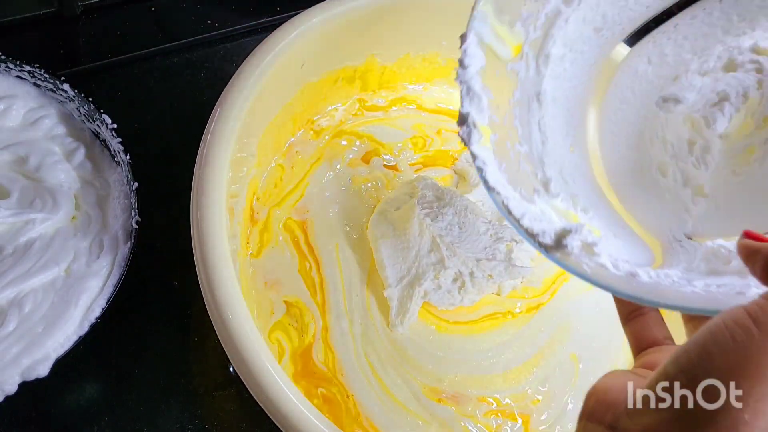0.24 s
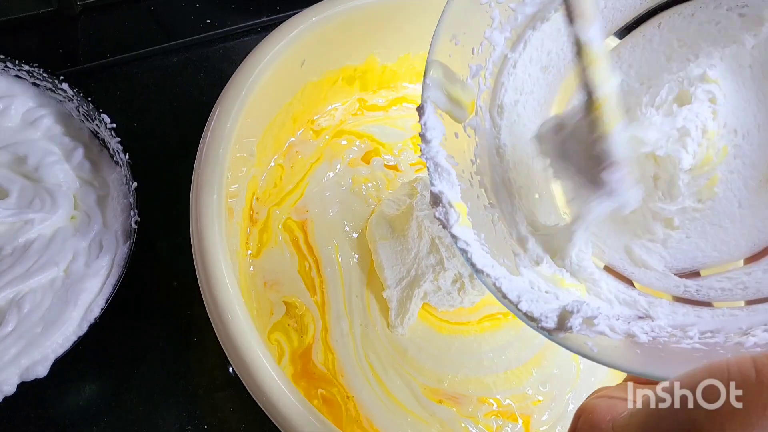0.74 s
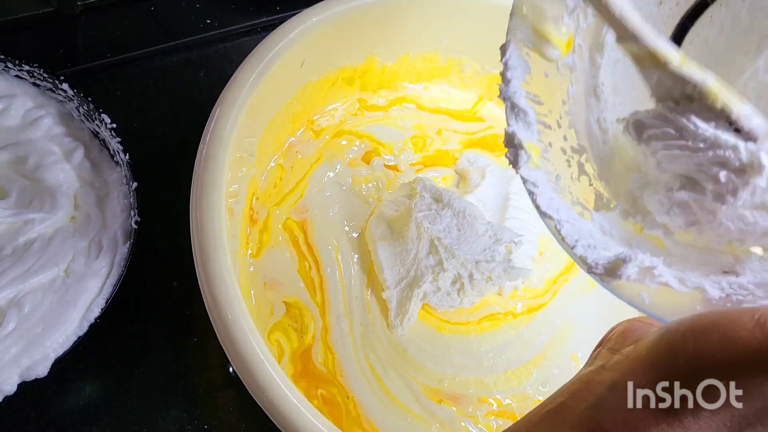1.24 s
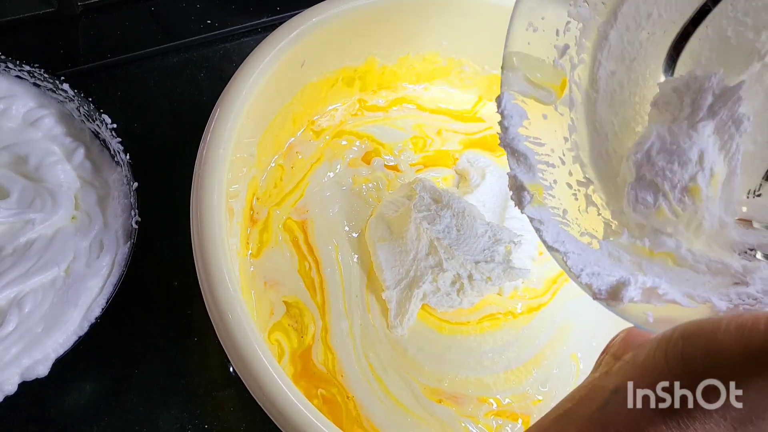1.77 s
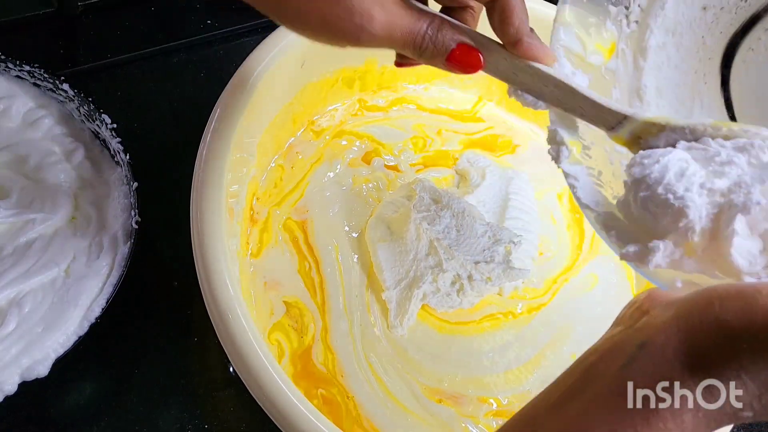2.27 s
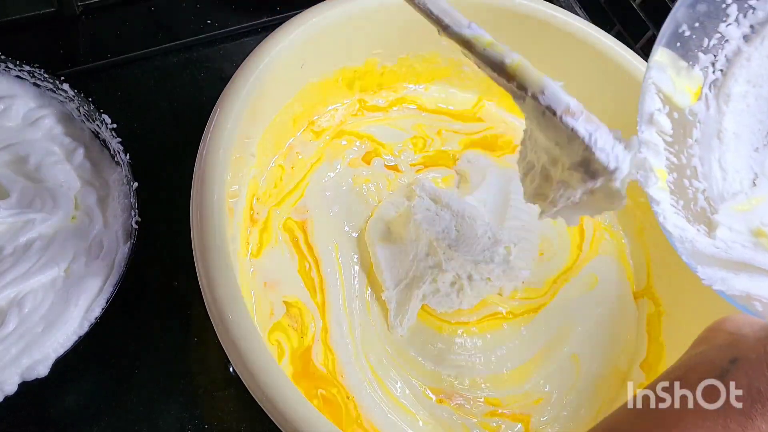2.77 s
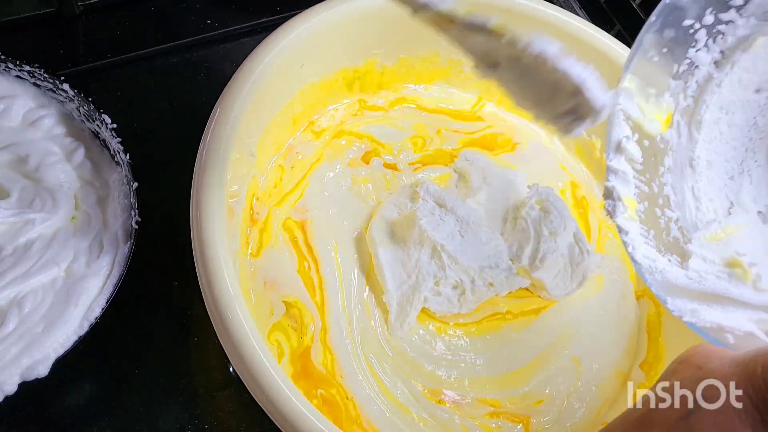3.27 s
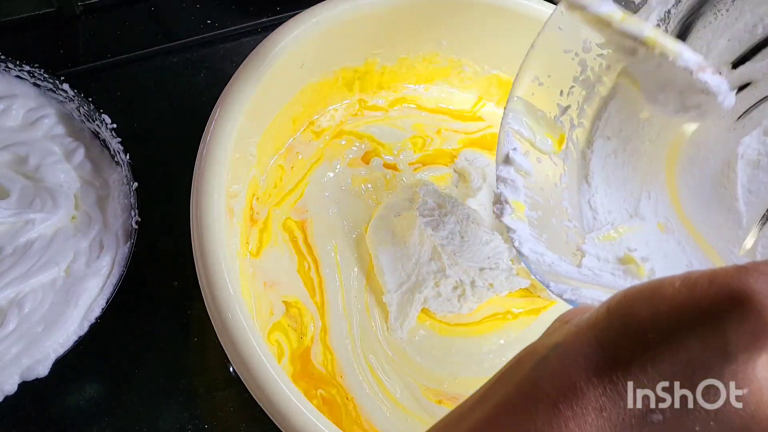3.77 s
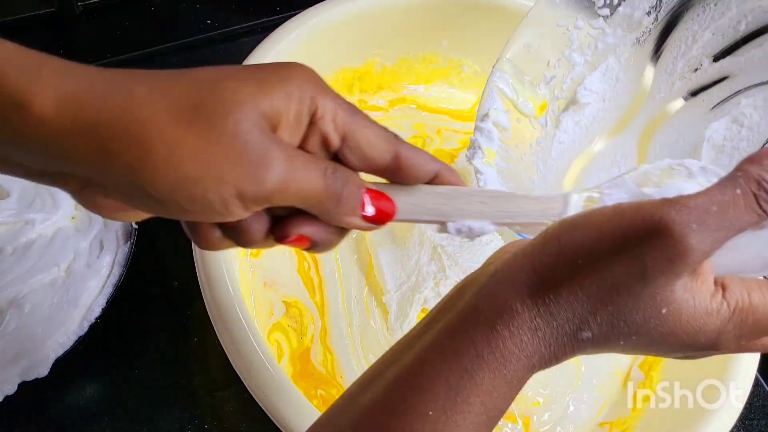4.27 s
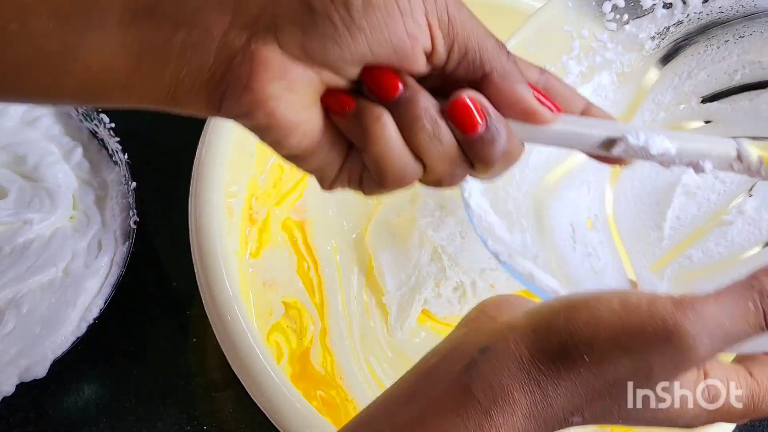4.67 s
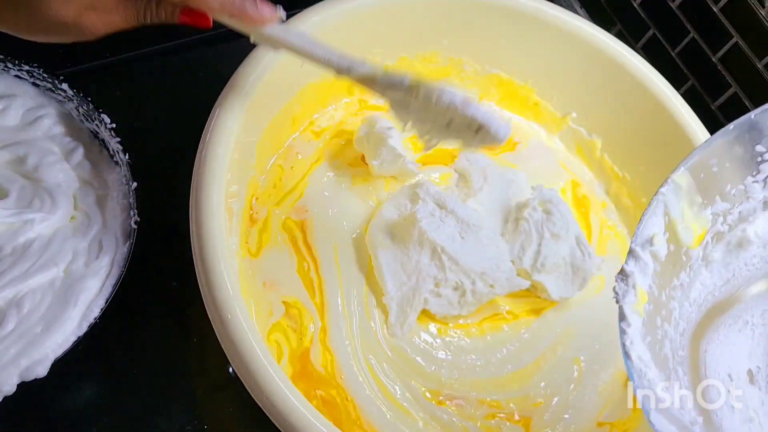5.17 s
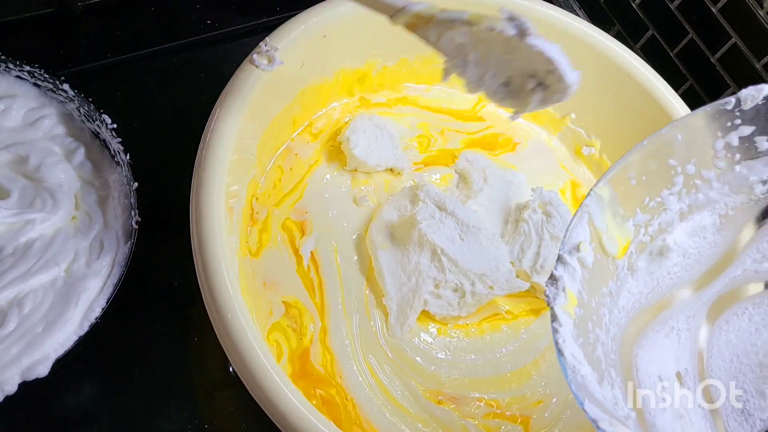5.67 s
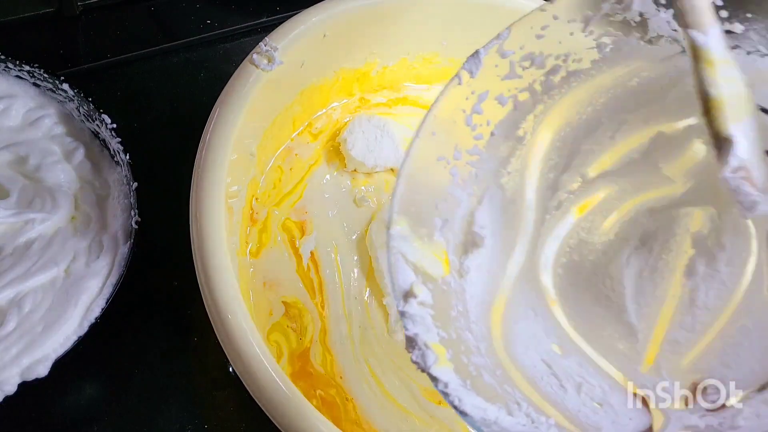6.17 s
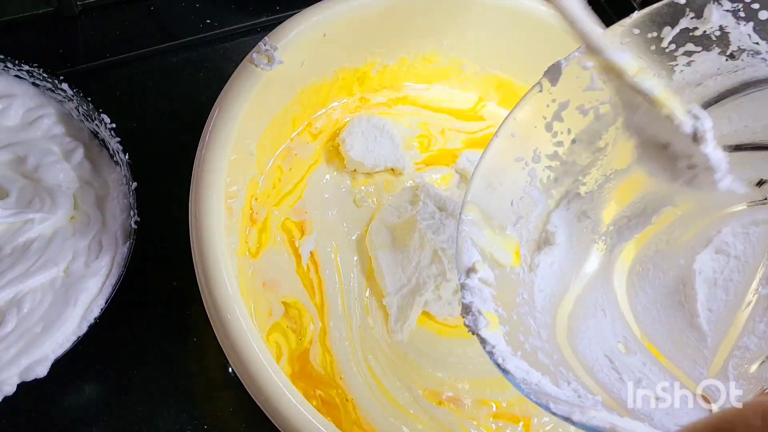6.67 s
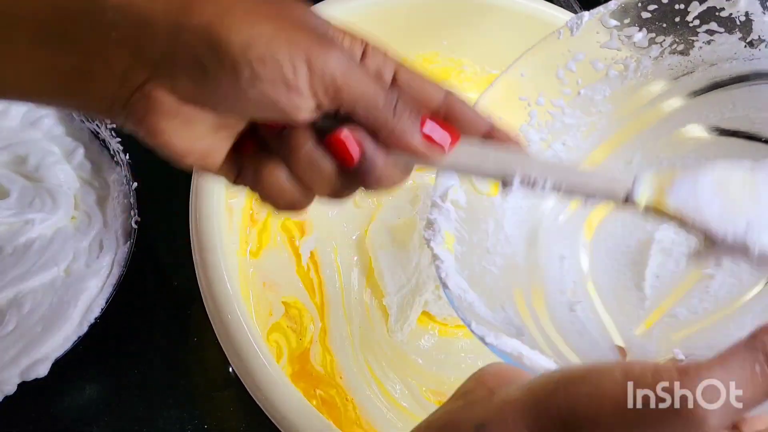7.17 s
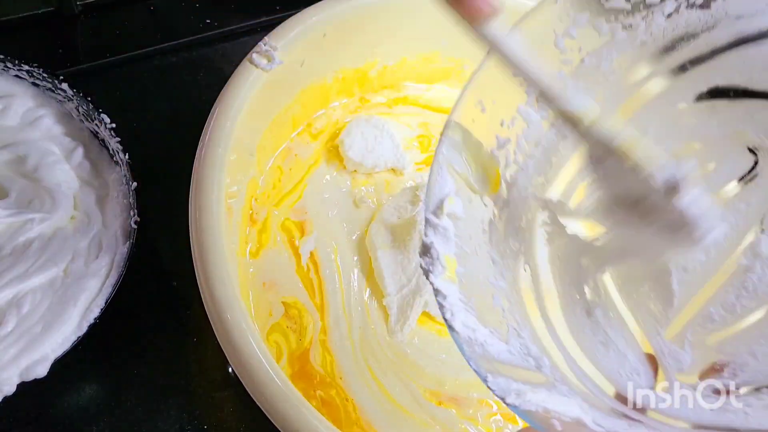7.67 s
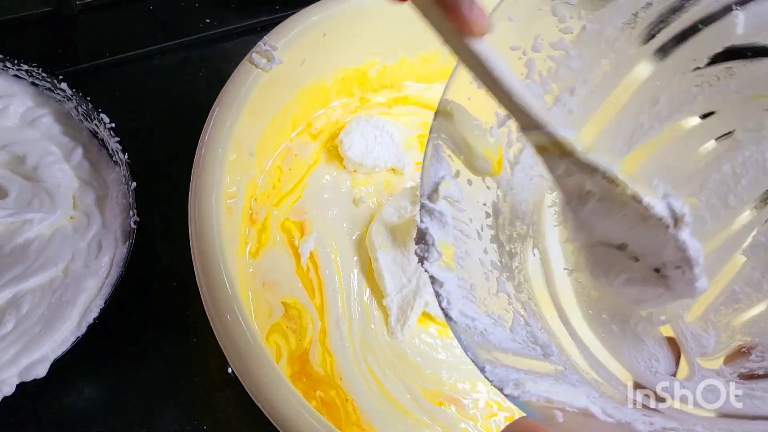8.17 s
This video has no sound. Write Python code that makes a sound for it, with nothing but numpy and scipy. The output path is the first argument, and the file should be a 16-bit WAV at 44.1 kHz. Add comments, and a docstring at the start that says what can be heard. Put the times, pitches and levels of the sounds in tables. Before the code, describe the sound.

Whipped cream crackles faintly as a wooden spoon scoops it from glass with dull knocks, then raps twice on a rattling plastic mixing bowl.

```python
"""Spooning whipped cream

A kitchen, a stereo pair close to the bowls, an appliance humming behind. A wooden spoon scoops whipped
cream from a hand-held glass bowl: the foam fizzes and pops, the wood rubs the glass and knocks on it
through a cushion of cream. Rapped twice on its rim, a plastic mixing bowl rattles on the counter."""
import sys
import numpy as np
from scipy import signal
from scipy.fft import rfft, irfft
from scipy.io import wavfile

SR = 44100
rng = np.random.default_rng(int(sys.argv[2]) if len(sys.argv) > 2 else 0)


def generate_wav(signal):
    """Clip the signal to [-1, 1] and save it as 16-bit WAV at the path in sys.argv[1]."""
    frames = np.transpose(np.atleast_2d(signal))
    scaled = np.clip(frames, -1, 1) * 32767
    pcm = np.round(scaled).astype(np.int16)
    wavfile.write(sys.argv[1], SR, pcm)


N = 372108
TIME = np.arange(N) / SR

# diffuse sound across the two microphones: f/Hz, coherence
COHERENCE = [(60, 0.32), (150, 0.62), (380, 0.78), (950, -0.25), (2400, -0.063), (5000, 0), (16000, 0)]
# still air of the kitchen: f/Hz, relative level/dB
ROOM_TONE = [(15, -21.5), (25, -2), (108, -8), (175, -8), (242, -21.5), (344, -13.5), (384, -21.5),
             (677, -25.5), (988, -32.5), (1520, -38.5), (3250, -47), (3720, -45.5), (5140, -44),
             (10700, -37), (12200, -48.5), (16000, -55)]
# appliance motor and mains: f/Hz, rms level/dB, waver/dB
HUM = [(38.5, -72.5, 3.5), (50, -60, 2), (100.3, -59.5, 0.4), (152.7, -65.5, -0.5)]
# appliance casing and fan: f/Hz, width/Hz, rms level/dB
WHIRR = [(95, 17, -64), (354, 56, -75.5), (631.8, 17, -78.5), (1540, 78, -88), (3620, 300, -88)]
# early reflections against the direct sound: f/Hz, level/dB
EARLY_SPECTRUM = [(80, -18), (350, -11), (700, -6), (1500, -3.5), (4000, -1), (14000, -4.5)]
# reverberation against the direct sound: f/Hz, level/dB
TAIL_SPECTRUM = [(80, -3.5), (250, -14), (600, -15), (1500, -9), (4000, -7), (14000, -9.5)]
# reverberation time: f/Hz, t60/s
TAIL_T60 = [(100, .45), (300, .4), (1000, .44), (3000, .47), (6000, .43), (14000, .33)]

# air pockets in the cream: t/s, level/dB, low cut/Hz, left over right/dB
POPS = [(0.1092, -34.5, 1500, 11), (.8807, -25, 1210, -4.5), (1.0084, -24, 3520, -3),
        (2.0037, -23, 1500, -4), (5.195, -21.5, 500, 1), (6.0873, -28, 700, 17), (6.594, -17.5, 9100, -13),
        (7.426, -32, 5140, 18), (7.9287, -17, 900, -1)]
# spoon strokes: t of fastest moment/s, swell/s, fade/s, fizz/dB, rub/dB, drag/dB
STROKES = [(.13, .03, 0.2, -70, -73.5, -61), (.62, 0.48, 0.17, -66.5, -76, -66),
           (1.11, 0.2, 0.27, -70.5, -73, -63), (1.5, 0.11, 0.24, -66, -64, -60.5),
           (1.862, 0.012, 0.03, -56, -82, -81), (2.02, 0.11, 0.16, -64, -70.5, -58.5),
           (2.5, 0.16, 0.075, -68.5, -71.5, -58.5), (2.66, 0.019, 0.063, -78, -66.5, -65),
           (2.93, 0.019, 0.049, -81.5, -60, -53.5), (3.7, 0.15, 0.35, -60.5, -69.5, -64.5),
           (4.2, 0.27, 0.26, -77.5, -61.5, -60.5), (4.66, 0.066, .09, -67, -73.5, -72),
           (5.15, 0.032, 0.055, -65.5, -75.5, -70), (5.21, 0.02, 0.041, -80, -64.5, -60),
           (6.1, .04, 0.12, -77, -66.5, -67), (6.28, 0.12, 0.07, -60.5, -72, -79.5),
           (6.8, 0.092, 0.26, -64.5, -72, -72.5), (7.55, 0.04, 0.071, -65, -65.5, -52.5),
           (7.88, .1, .12, -68, -65.5, -71), (8.14, 0.13, 0.15, -69, -71, -70)]
# noise colours: f/Hz, relative level/dB
POP_SPECTRUM = [(500, -3.5), (1500, -1), (2600, -8), (4000, -5.5), (8000, -3.5), (16000, -2)]   # an air pocket snapping
FIZZ_SPECTRUM = [(1500, -23.5), (3000, -15.5), (4000, -8), (6000, -4), (9000, 0.5), (12000, 2.5),
                 (16000, -3)]   # foam cells bursting
RUB_SPECTRUM = [(900, -2), (1400, 2), (1850, -4.5), (2400, -0.5), (3000, -5), (3900, 3), (5200, -1),
                (7000, -3.5), (12000, -10.5)]   # wood rubbing glass
DRAG_SPECTRUM = [(120, -7.5), (200, 4.5), (260, -0.5), (350, 2.5), (480, 1), (670, -0.5), (900, -13),
                 (1500, -26.5), (3000, -34)]   # the spoon dragging on the wall
TICK_SPECTRUM = [(700, -5), (1500, -6), (2600, -5), (4000, -3.5), (6500, -5.5), (10000, -1.5),
                 (16000, -5.5)]   # wet foam under a knock
BUZZ_SPECTRUM = [(500, -4), (1200, 14.5), (2000, 4.5), (2900, -6), (3900, -3), (5200, -7), (8000, -12.5),
                 (12000, -15), (16000, -19.5)]   # plastic buzzing
# borders between the size classes of foam cells: f/Hz
FOAM_EDGES = [3000, 5000, 7500, 10500]

# raps on the mixing bowl: t/s, crack/dB, landing/dB, bass tilt/(dB per octave), first bounce/dB,
# dulling/(octaves per bounce)
RAPS = [(5.2778, 34, 28.5, 1, 27, 0.1), (5.4805, 33, 27, 3, 19.5, .22)]
# plastic rim and spoon handle: f/Hz, width/Hz, level/dB
PLASTIC_RIM_MODES = [(590, 22, -6), (865, 61, -2), (1032.1, 94, -4), (1420, 150, -14), (1706, 570, -24),
                     (2260, 200, -29), (4070, 490, -31.5)]
# mixing bowl full of batter, standing on the counter: f/Hz, width/Hz, level/dB
MIXING_BOWL_MODES = [(50, 24, -10.5), (89.3, 14, 4), (114.3, 7.3, 9), (144, 39.8, 1), (202.9, 12, 12),
                     (242, 23, 1), (303.4, 14, 3.5), (409.6, 15, -2), (450, 12, 4.5), (505, 15, 9),
                     (590, 12, 4), (690, 10, 2.5), (805, 14, -6), (819.4, 120, 2.5), (1005, 46, -2.5),
                     (1140, 30, 2.5), (1630, 70, -0.5)]

# touches on the bare glass rim: t/s, level/dB
CLINKS = [(1.9976, -4), (2.1945, -9.5), (7.5396, -2)]
# bare glass rim: f/Hz, width/Hz, level/dB
GLASS_RIM_MODES = [(1940, 14, -4), (2582, 14, -0.5), (3680, 32, 2.5), (4830, 70, -11), (4950, 60, -5.5),
                   (7500, 40, -7)]
# spoon on the glass: t/s, force/dB, contact cut-off/Hz, wood resonance/Hz, wood/dB, wall ring/dB,
# wet tick/dB, left over right/dB
KNOCKS = [(.567, -20, 884, 600, -15, -12, -57, -1), (1.11, -18, 1090, 600, -11, 0, -33, 0),
          (1.1281, -7.5, 750, 226, 17, 3.5, -15.5, -3.5), (1.1383, -16, 496, 199, 12, 5, -39, -3),
          (1.158, -23, 900, 168, -3, -19, -36, 3), (1.5852, 13, 1040, 728, 19, 21, -14, -0.5),
          (1.823, -9.5, 600, 308, -3, -24, -25, 2.5), (1.997, -2, 1670, 600, -11, 4.5, -31, -6.5),
          (2.067, -19.5, 3030, 685, -18, -22, -46, -3), (2.1934, 9.5, 1100, 1090, 6, 6.5, -27.5, -1),
          (2.9355, -10.5, 1270, 360, -28, -34, -55, -2.5), (3.525, 2, 1274, 725, 0.5, 20, -23.5, -5),
          (6.02, 1.5, 1114, 783, -12, 23, -22.5, -1), (6.5117, 15, 5260, 1200, 20, 19, -3.5, -3.5),
          (7.333, -11, 570, 334, 5, -10, -34, 1), (7.5387, 7, 1910, 585, 6, 4, -32.5, -6),
          (7.557, 7, 856, 590, 2, 20.5, -23, -3), (7.7657, 11, 634, 510, 12, 20.5, -18, 1),
          (7.8744, 4, 600, 450, 4.5, 16.5, -21.5, 0), (8.0482, -7, 524, 326, 6.5, -14, -21, 1.5),
          (8.17, -12.5, 860, 770, -10.5, -25, -34.5, -6)]
# glass bowl, damped by hand and cream: f/Hz, width/Hz, level/dB
GLASS_MODES = [(516, 120, -1.5), (600, 270, 3), (727, 100, 4.5), (946, 50, -3), (1182, 440, -3),
               (1320, 400, -3), (1576, 140, -16.5), (1940, 130, -5), (2170, 220, -5), (2470, 580, -6),
               (2900, 210, -6.5), (3570, 270, -6), (4080, 1300, -14.5), (4950, 710, -12), (6270, 500, -7.5),
               (7950, 450, 2)]
# the bowl's give in the hand: f/Hz, width/Hz, level/dB
HAND_MODES = [(127, 31, -1), (243, 130, 3)]


def from_db(db):
    return 10 ** (np.asarray(db) / 20)


def unit_rms(x):
    return x / np.sqrt(np.mean(x ** 2) + 1e-20)


def unit_energy(x):
    return x / np.sqrt(np.sum(x ** 2))


def at_hz(points, hz):
    """Read a table on a log-frequency axis."""
    knots_hz, values = np.array(points).T
    return np.interp(np.log(hz + 1e-9), np.log(knots_hz), values)


def pan(db):
    """Microphone gains, the left louder than the right by db."""
    return from_db(np.array([[db], [-db]]) / 2)


def add(out, s, sound):
    """Mix a short sound in at s seconds."""
    i = int(s * SR)
    out[..., i:i + sound.shape[-1]] += sound[..., :out.shape[-1] - i]


def butter(x, order, hz, kind="low"):
    return signal.sosfilt(signal.butter(order, hz, kind, fs=SR, output="sos"), x)


def drift(per_s):
    """A smooth wander through per_s random values a second."""
    knots = rng.standard_normal(N // 20)
    return np.interp(TIME * per_s, np.arange(len(knots)), knots)


def noise(spectrum, size=N):
    """Coloured stereo noise, alike at both microphones in the bass; 0 dB is white noise of rms 1."""
    hz = np.arange(size // 2 + 1) * SR / size
    mid, side = rfft(rng.standard_normal((2, size)))
    alike = at_hz(COHERENCE, hz)
    both = np.sqrt((1 + alike) / 2) * mid + np.sqrt((1 - alike) / 2) * side * [[1], [-1]]
    return irfft(both * from_db(at_hz(spectrum, hz)), size)


def burst(spectrum, t60, size=8192):
    """A dying puff of noise; a 0 dB spectrum gives the energy of a unit click."""
    return noise(spectrum, size) * unit_energy(from_db(-60 * TIME[:size] / t60))


def contact(cut_hz, order=4, size=8192):
    """The force pulse of one touch: the softer the touch, the longer and duller."""
    return butter(signal.unit_impulse(size) + 1e-18, order, cut_hz)


def resonate(x, hz, width_hz):
    """One resonance with gain 1 at its peak."""
    r = np.exp(-np.pi * width_hz / SR)
    feedback = [1, -2 * r * np.cos(2 * np.pi * hz / SR), r * r]
    return signal.lfilter(np.array([1, 0, -1]) * (1 - r * r) / 2, feedback, x + 1e-18)


def body(x, modes, spread_db, lag_s):
    """Neighbouring modes swing opposite ways; each meets each microphone at its own level and delay."""
    out = np.zeros((2, len(x)))
    for k, (hz, width, db) in enumerate(modes):
        ring = (-1) ** k * resonate(x, hz, width)
        for mic in out:
            add(mic, lag_s * rng.random(), ring * from_db(db + spread_db * rng.standard_normal()))
    return out


def background(room_tone_db=-60):
    """An appliance's motor hums and its fan and casing whirr over the room tone."""
    hum = 0
    for hz, db, waver_db in HUM:
        peak = np.sqrt(2) * from_db(db + waver_db * drift(3.4))
        hum += peak * np.sin(2 * np.pi * (hz * TIME + rng.random()))
    air, whirr = noise(ROOM_TONE), 0
    for hz, width, db in WHIRR:
        band = resonate(resonate(air, hz, width), hz, width)
        whirr += from_db(db) * unit_rms(band)
    return hum * pan(.8) + whirr + from_db(room_tone_db) * unit_rms(noise(ROOM_TONE))


def kitchen_reverb(x, early_t60=.13, size=32768):
    """Near reflections from counter and tiles, then a diffuse tail that dies band by band."""
    t, hz = TIME[:size], np.arange(size // 2 + 1) * SR / size
    diffuse, tail = rfft(noise(TAIL_SPECTRUM, size)), 0
    for centre, t60 in TAIL_T60:
        band = at_hz([(f, f == centre) for f, _ in TAIL_T60], hz)
        fade = from_db(-60 * t / t60) * (1 - np.exp(-t / .005))
        tail += irfft(diffuse * band) * unit_energy(fade)
    early_fade = from_db(-60 * t / early_t60) * (1 - np.exp(-t / .001))
    early = noise(EARLY_SPECTRUM, size) * unit_energy(early_fade)
    return signal.fftconvolve(x.mean(axis=0)[None], early + tail, axes=1)[:, :N]


def air_pops():
    """Single pockets of air snap open in the cream; small ones have no lows."""
    out = np.zeros((2, N))
    for s, db, low_hz, side_db in POPS:
        snap = butter(burst(POP_SPECTRUM, t60=.018), 2, low_hz, "high")
        add(out, s, from_db(db) * snap * pan(side_db))
    return out


def stroke_gains(range_db=12):
    """Fizz, rub and drag gain range_db over a swell as the spoon speeds up, and lose it over a fade."""
    power = np.zeros((3, N))
    for s, swell_s, fade_s, *levels_db in STROKES:
        from_peak = np.maximum((s - TIME) / swell_s, (TIME - s) / fade_s)
        moving = from_peak < 5
        power[:, moving] += np.outer(from_db(levels_db), from_db(-range_db * from_peak[moving])) ** 2
    return np.sqrt(power)


def random_clicks(per_s, step_db, max_steps):
    """Impulses at random times, most weak and a few strong."""
    fires = rng.random(N) < per_s / SR
    return fires * from_db(step_db * np.minimum(rng.exponential(1, N), max_steps))


def foam_crackle(level_db=-3.5):
    """Sticky foam tears in tiny separate snaps."""
    snaps = random_clicks(per_s=140, step_db=4, max_steps=3.5)
    crackle = signal.fftconvolve(snaps[None], burst(FIZZ_SPECTRUM, t60=.0091), axes=1)[:, :N]
    return from_db(level_db) * unit_rms(crackle)


def foam_fizz(cell_decay_s=.0005, patch_db=3.5, patches_per_s=11):
    """Bursting cells make a grainy hiss whose colour shifts with coarser and finer foam."""
    cells = random_clicks(per_s=2500, step_db=3.5, max_steps=5)
    cell_power = signal.lfilter([1], [1, -np.exp(-1 / (SR * cell_decay_s))], cells)
    spectrum, hiss = rfft(noise(FIZZ_SPECTRUM)), 0
    size_class = np.searchsorted(FOAM_EDGES, np.arange(N // 2 + 1) * SR / N)
    for k in range(len(FOAM_EDGES) + 1):   # each class comes and goes on its own
        band = irfft(spectrum * (size_class == k), N)
        hiss += band * from_db(patch_db * drift(patches_per_s))
    return unit_rms(hiss * np.sqrt(cell_power))


def spoon_strokes():
    """The moving spoon smears the foam, rubs the glass and drags on its wall."""
    fizz_gain, rub_gain, drag_gain = stroke_gains()
    fizz = foam_fizz() * pan(.5)
    rub = from_db(1.2 * drift(90)) * unit_rms(noise(RUB_SPECTRUM)) * pan(.6)
    drag = from_db(2.5 * drift(67)) * unit_rms(noise(DRAG_SPECTRUM)) * pan(-1.5)
    crackle = foam_crackle() * pan(-4)
    return fizz_gain * (fizz + crackle) + rub_gain * rub + drag_gain * drag


def bowl_chatter(s, first_db, dulling, modes, bounces=8):
    """The mixing bowl bounces to rest: the bounces slow, weaken and dull, and buzz less."""
    gap_s, slowing, jitter = .01, 1.025, .02
    first_cut_hz, loss_db, ring_db = 930, 1.23, -18
    buzz_db, buzz_loss_db = -26, 2.4
    buzz, force = np.zeros((2, N)), np.zeros(N)
    for k in range(bounces):
        add(force, s, from_db(first_db - loss_db * k) * contact(first_cut_hz / 2 ** (dulling * k)))
        add(buzz, s, from_db(first_db + buzz_db - buzz_loss_db * k) * burst(BUZZ_SPECTRUM, t60=.061))
        s += gap_s * slowing ** k * (1 + jitter * rng.standard_normal())
    thud = resonate(force, hz=320, width_hz=692)   # the counter answers each bounce with a dead pulse
    ring = from_db(ring_db) * body(force, modes, spread_db=0, lag_s=.0002)
    return buzz * pan(1.5) + thud * pan(-1.2) + ring * pan(-2.5)


def rim_raps(landing_s=.0038, buzz_db=-36):
    """A crack on the plastic rim drives the heavy bowl onto the counter, where it rings and chatters."""
    out = np.zeros((2, N))
    for s, crack_db, landing_db, bass_tilt, bounce_db, dulling in RAPS:
        crack = body(contact(3600, order=3), PLASTIC_RIM_MODES, spread_db=2, lag_s=.00014)
        buzz = from_db(buzz_db) * burst(BUZZ_SPECTRUM, t60=.051)
        add(out, s, from_db(crack_db) * (crack + buzz))
        modes = [(hz, width, db + bass_tilt * np.log2(400 / hz)) for hz, width, db in MIXING_BOWL_MODES]
        landing = body(contact(920, size=32768), modes, spread_db=3.5, lag_s=.00029)
        add(out, s + landing_s, from_db(landing_db) * landing * pan(-1.3))
        out += bowl_chatter(s + landing_s, bounce_db, dulling, modes)
    return out


def glass_clinks():
    """Where the bare rim is touched, the glass rings briefly."""
    taps = np.zeros(N)
    for s, db in CLINKS:
        add(taps, s, from_db(db) * contact(9000, order=2))
    return body(taps, GLASS_RIM_MODES, spread_db=1.5, lag_s=.0003) * pan(-3)


def glass_knocks():
    """Cream cushions each blow of the spoon; the bowl jolts in the hand, its wall hums, foam ticks."""
    wall_hz, wall_t60 = 355.3, .08   # lowest flexing mode of the glass
    grip_hz = 600   # the spoon's pitch in an ordinary grip
    jolt_db, jolt_db_per_octave = -2, 9.5   # a deeper push lowers that pitch and jolts the hand more
    push = contact(650, order=2)
    hand_give = sum(from_db(db) * resonate(push, hz, width) for hz, width, db in HAND_MODES)
    wall_ring = resonate(push, wall_hz, width_hz=np.log(1000) / np.pi / wall_t60)
    out = np.zeros((2, N))
    for s, force_db, cut_hz, wood_hz, wood_db, wall_db, tick_db, side_db in KNOCKS:
        clack = from_db(force_db) * body(contact(cut_hz), GLASS_MODES, spread_db=-.14, lag_s=.00033)
        jolt = from_db(force_db + jolt_db + jolt_db_per_octave * np.log2(grip_hz / wood_hz)) * hand_give
        wall = from_db(wall_db) * wall_ring
        tick = from_db(tick_db) * burst(TICK_SPECTRUM, t60=.026) * pan(.82)
        wood = from_db(wood_db) * resonate(contact(1.46 * wood_hz), wood_hz, width_hz=.23 * wood_hz)
        add(out, s, (jolt + wall + wood - clack + tick) * pan(side_db))
    return out


def scene():
    """Knocks, clinks, raps and pops set off the kitchen; the strokes and the hum lie under them."""
    hits = glass_knocks() + glass_clinks() + rim_raps() + air_pops()
    hits[0] = np.interp(TIME - .00018, TIME, hits[0])   # the left microphone is a little farther off
    strokes = spoon_strokes()
    return hits + kitchen_reverb(hits) + strokes + background()


def record(dry):
    """The microphones drop the deepest bass and soften the highest treble; the very top is cut."""
    x = butter(dry, 2, 30, "high")
    x = butter(x, 2, 14000)
    return signal.sosfilt(signal.ellip(12, .1, 80, 15900, fs=SR, output="sos"), x)


dry = scene()
out = record(dry)
generate_wav(out)
```